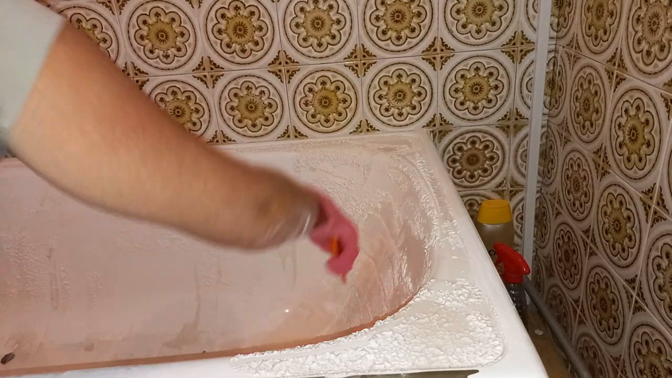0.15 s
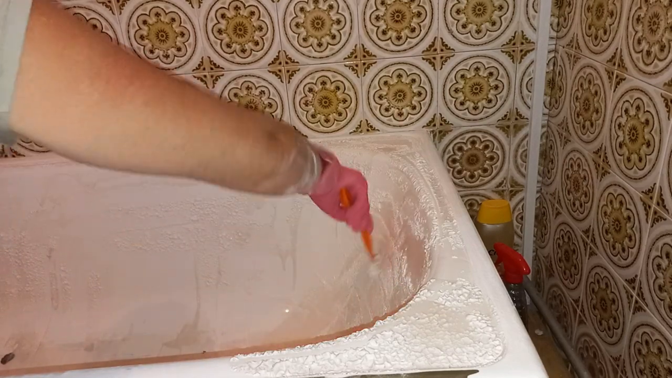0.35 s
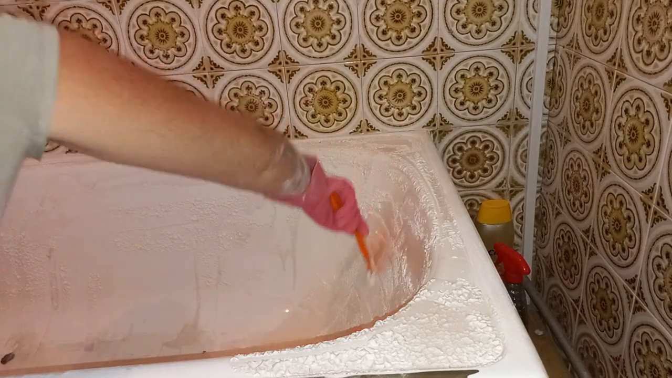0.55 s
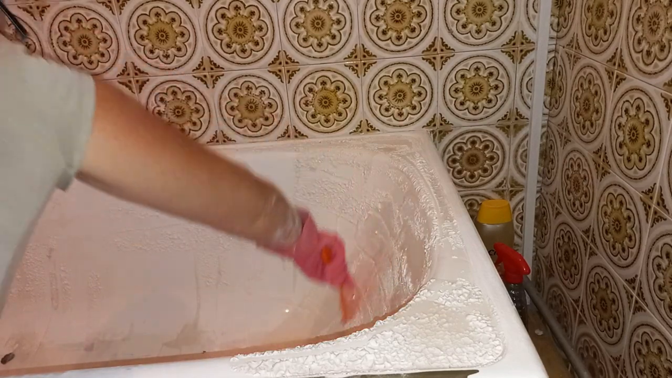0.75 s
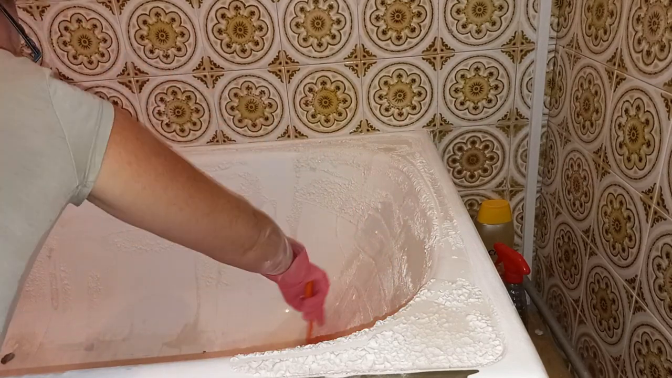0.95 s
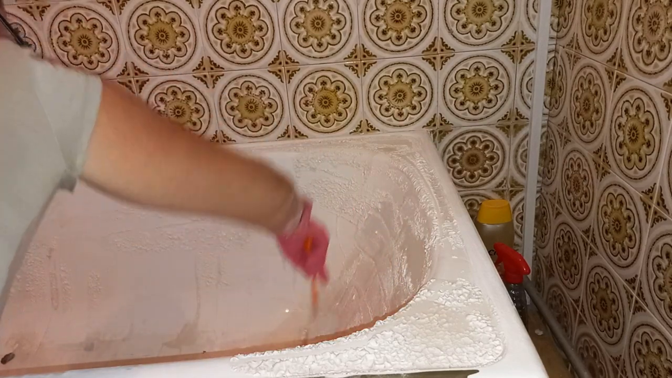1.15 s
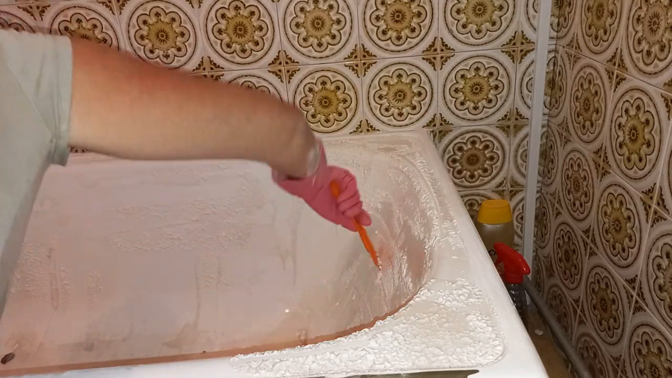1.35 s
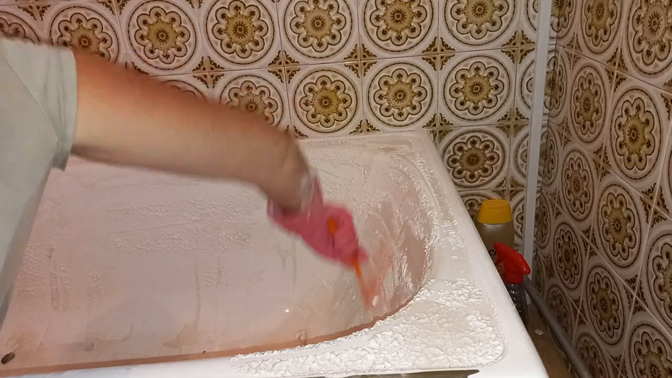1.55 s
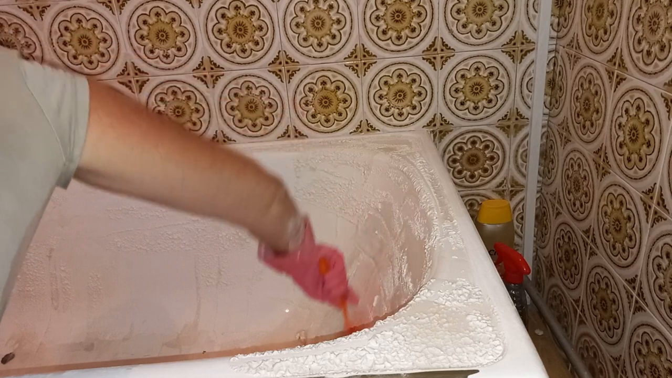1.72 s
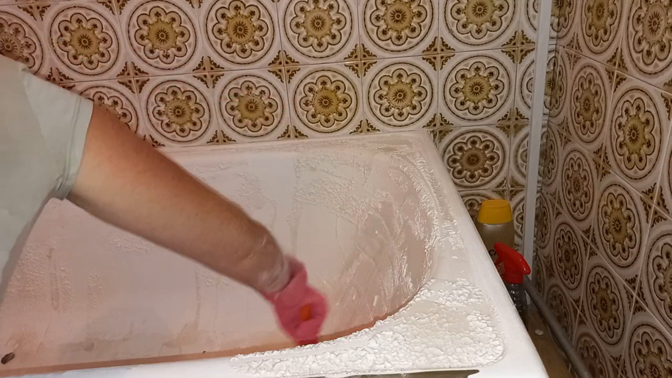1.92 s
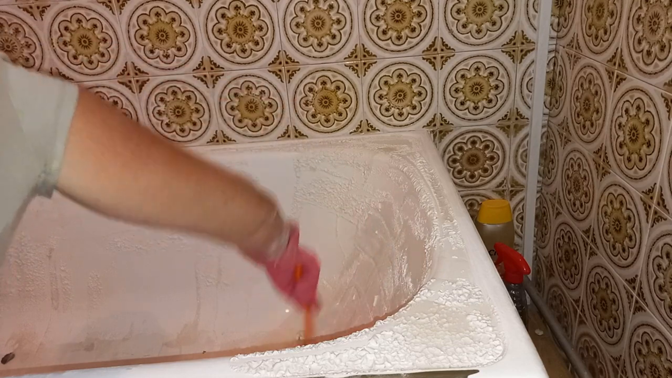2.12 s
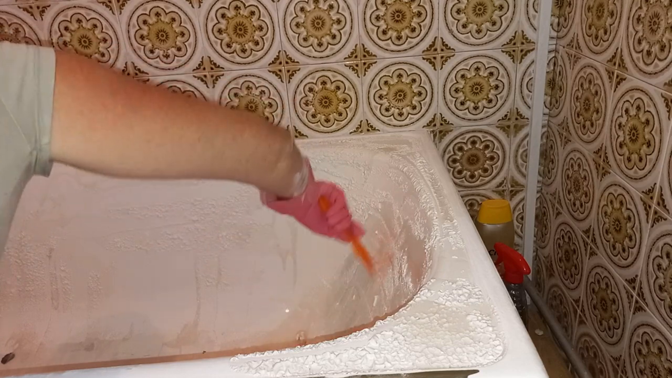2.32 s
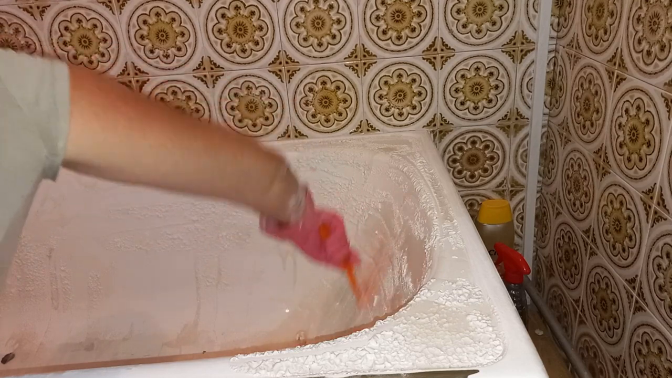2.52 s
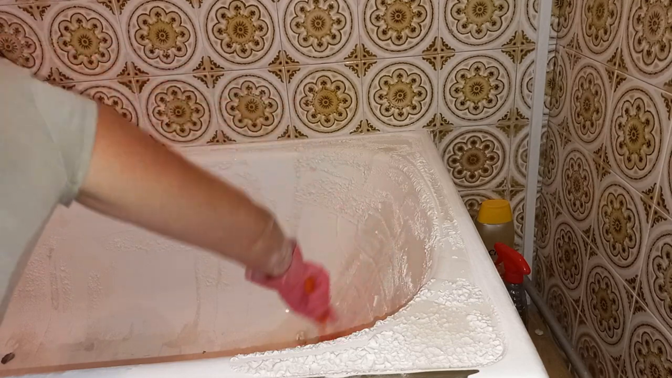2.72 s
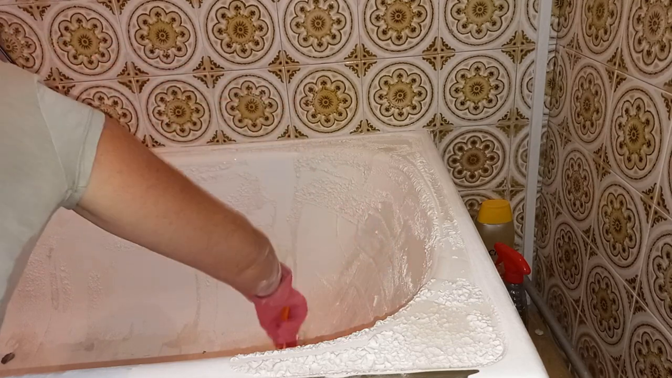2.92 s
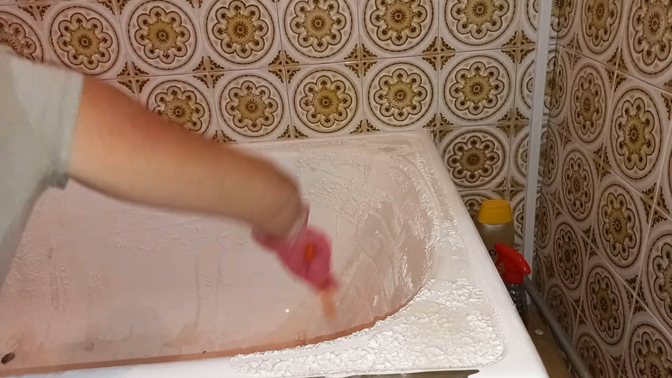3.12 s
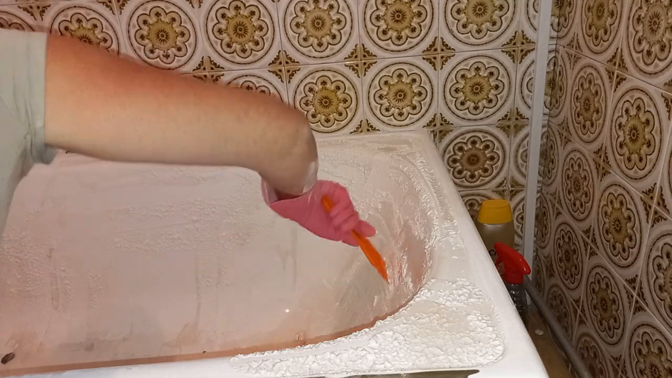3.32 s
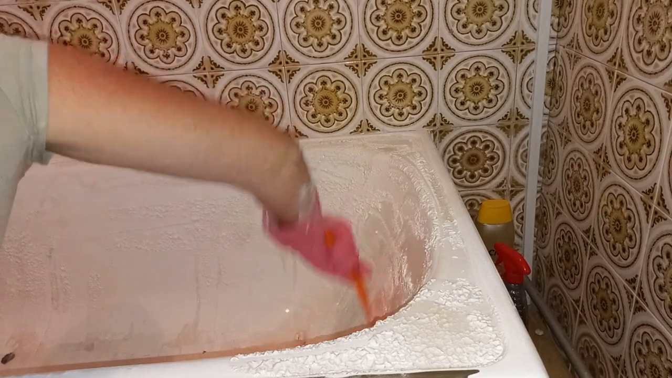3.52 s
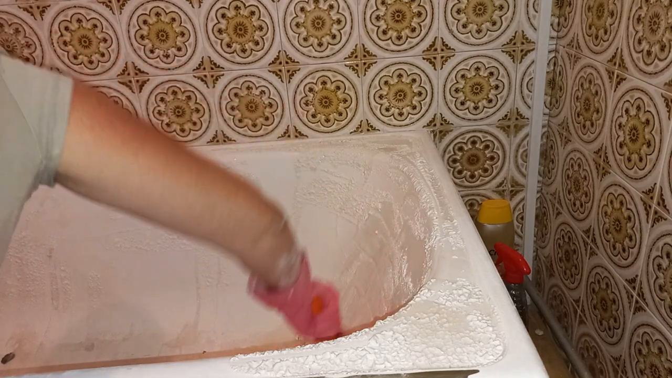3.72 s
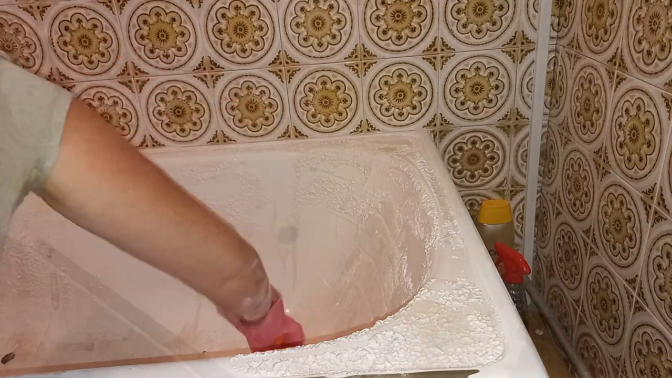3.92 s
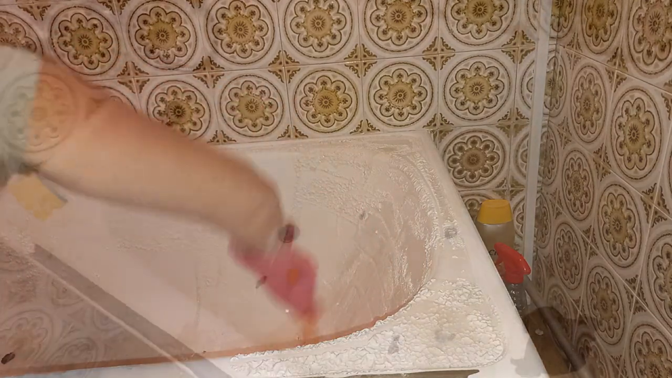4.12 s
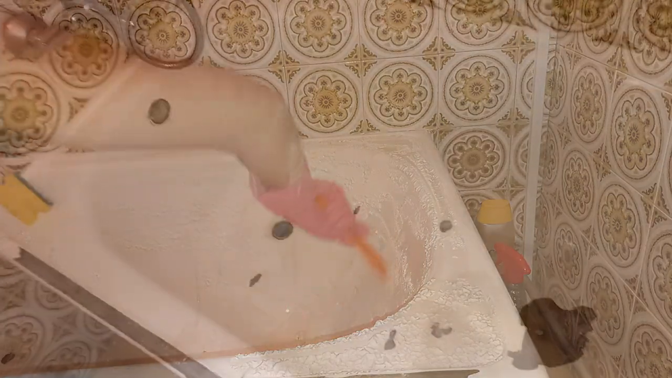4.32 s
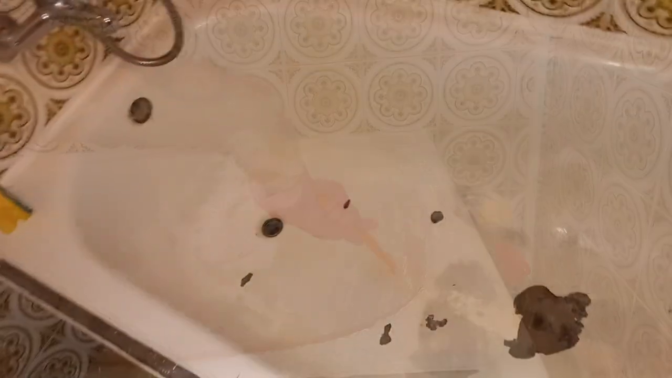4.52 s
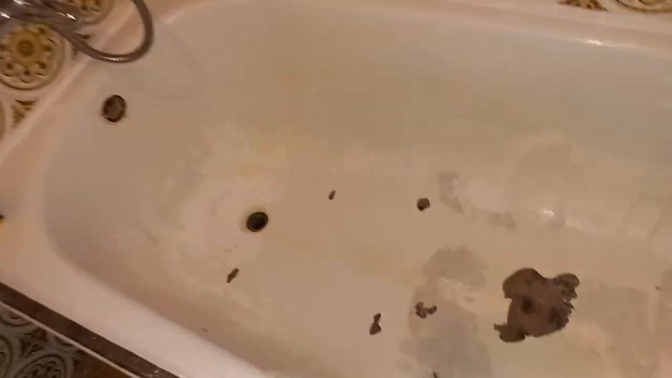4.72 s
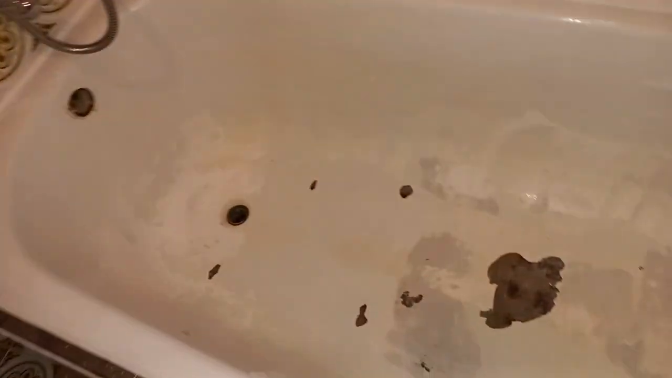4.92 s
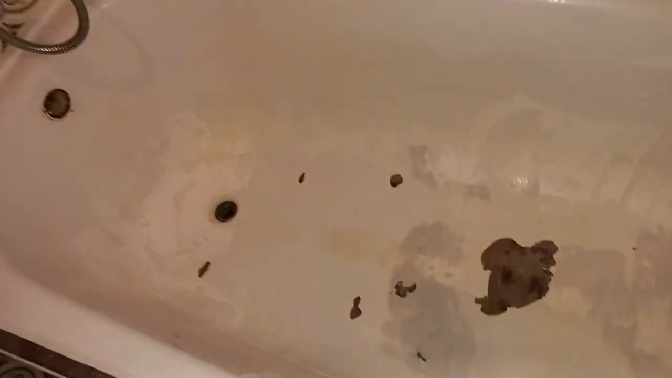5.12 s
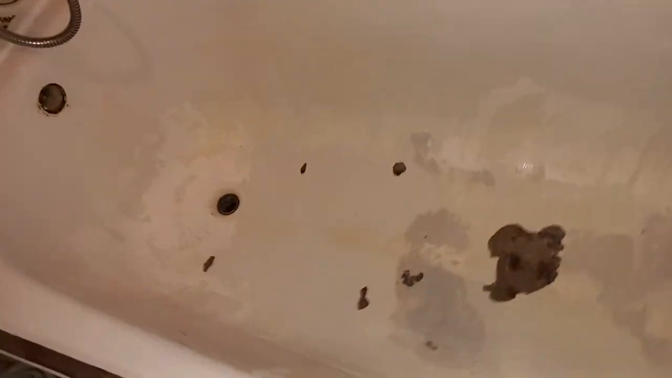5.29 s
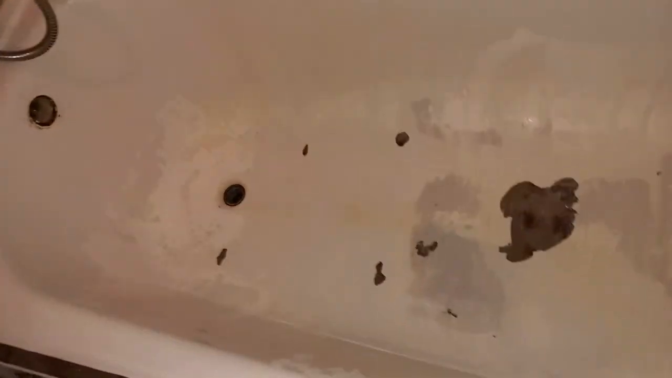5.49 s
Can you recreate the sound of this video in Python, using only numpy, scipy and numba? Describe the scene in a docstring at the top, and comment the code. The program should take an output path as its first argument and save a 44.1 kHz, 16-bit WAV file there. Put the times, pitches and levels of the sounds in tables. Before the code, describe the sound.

Close up and indoors, a blade drags along the wall of an enamel bathtub five times, with short pauses between strokes. Each scrape chatters, resonates in the hollow tub and fades as the hand lets go. The first two are softer, the next three bite with a sharp knock. A sleeve rustles very faintly between them. The scraper then knocks on the tub's bottom and pushes into a longer, grittier scrape over slight microphone hiss.

```python
"""A hand scraper strips softened coating from an enamel bathtub: five strokes on the side wall, then
knocks and a longer push on the bottom. The blade moves by stick-slip friction, a dense train of tiny
impulses that, like the blows of its landing and catching, excite the modes of the tub's shell and the
reflections in its hollow. Behind it are two wet ticks of loosened coating, a faint swish as the hand
swings back, and the hiss of one close microphone."""
import sys
import numpy as np
from scipy import signal
from scipy.fft import rfft, irfft
from scipy.io import wavfile
from scipy.ndimage import uniform_filter1d
from numba import njit

SR = 44100
rng = np.random.default_rng(int(sys.argv[2]) if len(sys.argv) > 2 else 0)


def transcribe(signal):
    """Save signal, clipped to [-1, 1], as a 16-bit WAV file at the path in sys.argv[1]."""
    frames = np.atleast_2d(signal).T
    limited = np.clip(frames, -1, 1)
    pcm = np.round(limited * 32767).astype(np.int16)
    wavfile.write(sys.argv[1], SR, pcm)


N = 244755
TIME = np.arange(N) / SR


def undb(db):
    """Decibels to amplitude ratio."""
    return np.exp(np.asarray(db) * np.log(10) / 20)


def unit(x):
    """Normalisation to an rms of one."""
    return x / np.sqrt(np.mean(x ** 2))


def band(x, lo_hz, hi_hz, order=4):
    """Causal Butterworth band-pass."""
    sos = signal.butter(order, [lo_hz, min(hi_hz, .45 * SR)], "band", fs=SR, output="sos")
    return signal.sosfilt(sos, x)


def colour(x, points, size=2048):
    """Minimum-phase filter through (Hz, dB) points, made by folding the cepstrum."""
    hz, db = np.transpose(points)
    bin_hz = np.arange(size // 2 + 1) * SR / size
    log_gain = np.log(undb(np.interp(np.log(bin_hz + 1), np.log(hz), db)))
    cepstrum = irfft(log_gain)
    cepstrum[1:size // 2] *= 2
    cepstrum[size // 2 + 1:] = 0
    return signal.fftconvolve(x, irfft(np.exp(rfft(cepstrum))))[:len(x)]


def fade(t, t60):
    """Exponential decay that loses 60 dB in t60 seconds."""
    return np.exp(-np.log(1000) * t / t60)


def walk(rate_hz):
    """Linear interpolation between random levels, with an rms of one."""
    step = int(SR / rate_hz)
    held = np.repeat(rng.standard_normal(N // step + 1), step)
    return unit(uniform_filter1d(held, step)[:N])


def placed(x, start):
    """A sound delayed to its start in seconds on the time line."""
    return np.concatenate([np.zeros(int(max(start, 0) * SR)), x, np.zeros(N)])[:N]


@njit
def resonate(x, hz, width_hz):
    """Second-order resonance of fixed bandwidth and moving centre (state-variable filter)."""
    y, band_state, low_state = np.empty(len(x)), 0., 0.
    for i in range(len(x)):
        g, damping = np.tan(np.pi * hz[i] / SR), width_hz / hz[i]
        v = (band_state + g * (x[i] - low_state)) / (1 + g * (g + damping))
        band_state, low_state = 2 * v - band_state, low_state + 2 * g * v
        y[i] = damping * v
    return y


# Spectrum of the microphone's hiss. Each row: frequency in Hz, relative level in dB.
HISS_SPECTRUM = [(18, -44), (30, -5.5), (907, -7), (1890, -10.5), (2210, -11), (4370, -10), (6310, -9.5),
                 (14200, -12), (15800, -14)]


def hiss(level_db=-74):
    """Microphone self-noise: stationary, coloured Gaussian noise."""
    return undb(level_db) * unit(colour(rng.standard_normal(N), HISS_SPECTRUM))


# Return swings of the hand. Each row: centre time in seconds, width in seconds, peak rms level in dB.
HAND_SWINGS = [(1.347, 0.07, -55), (1.668, 0.038, -78), (2.35, 0.13, -72), (2.583, 0.035, -70),
               (3.298, 0.11, -57), (3.564, 0.082, -73), (4.273, 0.1, -56)]


def swishes(length=0.32):
    """Friction noise of glove and sleeve: a thin rustle under a Gaussian envelope."""
    t = TIME[:int(length * SR)] - length / 2
    noise = rng.standard_normal((len(HAND_SWINGS), len(t)))
    rustles = unit(band(noise, 5700, 6350, order=2) + .5 * band(noise, 5000, 9000, order=2)
                   + .22 * band(noise, 9500, 14500, order=2))
    return sum(placed(rustle * undb(db) * np.exp(-(2 * t / width) ** 2), centre + t[0])
               for rustle, (centre, width, db) in zip(rustles, HAND_SWINGS))


# Wet ticks of loosened coating. Each row: start in seconds, nominal peak level in dB.
COATING_TICKS = [(0.7, -50.5), (.823, -58)]


def ticks(t60=0.028, crest_db=9):
    """Damped transients: the sticky coating snaps in short bursts of high noise."""
    t = TIME[:SR // 20]
    snap = unit(band(rng.standard_normal(len(t)), 3500, 4900, order=2)) * fade(t, t60)
    return sum(placed(undb(db - crest_db) * snap, start) for start, db in COATING_TICKS)


# Shell modes, the short ones damped by the coating. Each row: frequency in Hz, t60 in seconds,
# gain in dB when driven on the side wall, gain in dB when driven on the bottom.
SHELL_MODES = [(77.5, 0.067, -6.5, -3.5), (92, .17, -2, -3.5), (116, 0.19, -13, -6),
               (171.6, 0.092, -10, -7.5), (200, 0.081, -24.5, -25.5), (284.6, 0.16, 0.5, 2.5),
               (326, 0.057, -8.5, -3.5), (376.9, 0.24, -2.5, 5.5), (412.5, 0.041, -5, -6.5),
               (495.5, 0.19, -3.5, 1.5), (534.4, 0.28, -7, -1.5), (703.6, 0.16, -2.5, -0.5),
               (823.2, 0.073, -1, -19.5), (909, 0.38, 2, 3), (964, 0.13, 4, 2), (1051.7, 0.28, 2.5, -16),
               (1181, .14, -7, -6), (1250, .19, -8, -2), (1322, .19, 2, -5), (1391, .19, -5, -20),
               (1470, .17, -4, -19), (1569, 0.11, -2, -35), (1795, 0.12, -0.5, 5)]
WALL, BOTTOM = 0, 1
# Colour of the tub's hollow, driven on the side wall. Each row: frequency in Hz, relative gain in dB.
WALL_SPECTRUM = [(500, -35.5), (850, -2), (882, -0.5), (948, 0), (1180, -6), (1500, -4), (2300, -9.5),
                 (4070, -9), (5520, -18), (7300, -16), (8760, -20.5), (9890, -31.5), (11300, -51),
                 (14400, -26), (15500, -32.5)]
# The same, driven on the bottom. Each row: frequency in Hz, relative gain in dB.
BOTTOM_SPECTRUM = [(440, -23.5), (750, -4.5), (873, -6.5), (919, 1.5), (1260, -5), (1780, 0), (2290, -7.5),
                   (2530, -0.5), (3940, -2), (5410, -8.5), (7250, -9), (8760, -15), (10100, -31),
                   (14400, -27), (15500, -17)]


def tub_response(place, hollow_db, hollow_t60, direct=0.54):
    """Impulse responses: a click plus superposed damped modes, and diffuse tails from three spots."""
    t = TIME[:SR // 4]
    spectrum = WALL_SPECTRUM if place == WALL else BOTTOM_SPECTRUM

    def tint(x):
        """Filtering by the hollow, with a gentle bass roll-off."""
        return undb(hollow_db) * band(colour(x, spectrum), 300, SR / 2, order=1)

    shell = tint(direct * (t == 0))
    for hz, t60, *gains_db in SHELL_MODES:
        amplitude = undb(gains_db[place]) * 2 * np.log(1000) / (t60 * SR)
        shell += amplitude * fade(t, t60) * np.cos(2 * np.pi * hz * t)
    tails = [unit(rng.standard_normal(len(t)) * fade(t, hollow_t60)) for _ in range(3)]
    return shell, [tint(tail / np.sqrt(len(t))) for tail in tails]


def slips(per_second, scatter_db, chatter_hz, chatter_db, uneven_db):
    """Stick-slip friction: random impulses of unequal size, bunched by the blade's irregular chatter."""
    clicks = (rng.random(N) < per_second / SR) * rng.choice([-1, 1], N)
    sizes = undb(scatter_db * rng.standard_normal(N))
    cycles = np.cumsum(chatter_hz * np.exp(.4 * walk(90))) / SR
    # each cycle starts with a release and dies down while the edge sticks again
    return unit(clicks * sizes * undb(-chatter_db * (cycles % 1) + uneven_db * walk(55)))


# Bands of the drag under firm pressure: shudder, dull push, hollow honk, blade rasp, edge, grit.
# Each row: lower and upper limit in Hz, level in the coating and on the enamel in dB relative to
# FIRM_DB, exponent of growth with pressure.
DRAG_BANDS = [(68, 220, -19, -10, 0.49), (230, 540, -2.5, -10.5, 0.68), (573, 860, -1.5, -18.5, 0.82),
              (944, 2215, 1, 0, 1.03), (2155, 4600, -12, -3, 1.185), (5080, 14700, -16.5, -3.5, 1.166)]
FIRM_DB, LOOSE_BLADE_HZ = -28, 980
CUSHION_DB, CUSHION_S = 14, 0.015  # the soft coating briefly holds back the treble on landing
LANDING_DB, LANDING_S = 26.5, 0.02  # contact builds up this much, this fast


def drag(t, pressure_db, bite, tone_db, blade_hz, response, force):
    """Sliding friction, a power law of pressure: dull in the coating (bite 0), bright on enamel (1)."""
    effort_db = pressure_db - FIRM_DB
    # the blade rings higher as it bites, and lower as the hand lets go
    bend = undb(np.minimum(effort_db, 0)) ** .1
    ring_hz = (LOOSE_BLADE_HZ + bite * (blade_hz - LOOSE_BLADE_HZ)) * bend
    blade = resonate(force, np.clip(ring_hz, 800, 3000), width_hz=470.) + 0.24 * force
    blade *= np.std(band(force, 800, 2000)) / np.std(band(blade, 800, 2000))
    shudder_db, push_db, honk_db, edge_db, grit_db = tone_db
    cushion_db = CUSHION_DB * np.exp(-t / CUSHION_S)
    parts = [(force, shudder_db), (force, push_db), (force, honk_db), (blade, 0),
             (force, edge_db - cushion_db), (force, grit_db - cushion_db)]
    out = np.zeros(len(t))
    for (source, trim_db), (lo_hz, hi_hz, coating_db, enamel_db, growth) in zip(parts, DRAG_BANDS):
        surface_db = coating_db + bite * (enamel_db - coating_db)
        db = FIRM_DB + growth * effort_db + surface_db + trim_db
        tub_gain = np.sqrt(np.sum(band(response, lo_hz, hi_hz) ** 2))
        lead_s = .006 + 1 / lo_hz  # the force precedes the ring it builds up, most of all in the bass
        out += band(source, lo_hz, hi_hz) * undb(np.interp(t + lead_s, t, db)) / tub_gain
    return out * undb(-LANDING_DB * np.clip(1 - t / LANDING_S, 0, 1))


# Skids on the coating. Each row: start in seconds, length in seconds, initial pressure in dB, its fall
# in dB (negative for a rise), trims of shudder, push and edge in dB.
SKIDS = [(0.703, 0.17, -89.5, 1, -7.5, -3, -2), (0.793, 0.096, -67.5, -19, -0.5, -11, 19),
         (1.605, .15, -75.5, 3, -6, -7, -5), (1.75, 0.094, -41.5, -10.5, 0.5, -5, 9.5),
         (2.61, 0.11, -63.5, -2, -10, -4, -10), (2.685, .1, -45.5, -5, 15, 1, -2.5),
         (3.59, 0.26, -82, 5.5, -2.5, 12, -2.5), (4.636, 0.13, -64, 12.5, -6.5, 4, -8),
         (4.778, 0.23, -18, 53, 12.5, 10.5, -4.5)]


def skids(begin, end, response, force, release_s=.014):
    """Friction without cutting: the blade slides on the coating as pressure changes linearly in dB."""
    out = np.zeros(N)
    for start, length, db, fall_db, shudder_db, push_db, edge_db in SKIDS:
        if begin <= start < end:
            inside = (TIME >= start) & (TIME <= start + length)
            t = TIME[inside] - start
            contact = np.clip((length - t) / release_s, 0, 1)
            tone_db = (shudder_db, push_db, 0, edge_db, edge_db - 6)
            skid = drag(t, db - fall_db * t / length, 0, tone_db, LOOSE_BLADE_HZ, response, force[inside])
            out += placed(contact * skid, start)
    return out


# The blade lands or catches. Each row: start in seconds, nominal peak level in dB, dull share and
# bright share in dB relative to the middle band.
BLOWS = [(0.795, -51.5, 1, -10), (0.855, -34, -2, -2.5), (1.693, -43.5, 31, -33), (1.759, -33, 2, -18),
         (1.835, -11, -21, -12.5), (2.617, -50, -4, -28), (2.698, -31, 8, -32), (2.779, -17, -10.5, -13),
         (3.589, -64, 23, -18), (3.689, -29.5, 23, -20), (3.704, -15, 18, -30), (3.745, -8.5, -2, -9),
         (3.859, -10, -13, -4), (4.65, -43.5, 23, -15.5), (4.758, -18.5, 23.5, -27),
         (4.793, -10.5, 14, -30), (4.801, -5, 16.5, -14), (4.837, -15.5, 18.5, -0.5),
         (5.008, -14.5, 34, -10), (5.143, -10.5, 5, -16)]


def knocks(begin, end, response, crunch=0.066, crunch_t60=0.049, crest_db=11):
    """Impact excitation: an impulse as the blade strikes, then a brief crunch through the coating."""
    rows = [row for row in BLOWS if begin <= row[0] < end]
    starts, db, dull_db, bright_db = np.transpose(rows)[:, :, None]
    t = TIME[:SR // 20]
    blows = (t == 0) + crunch * rng.standard_normal((len(rows), len(t))) * fade(t, crunch_t60)

    def ring_rms(x):
        """Rms of the tub's response over the first 20 ms of each blow."""
        ring = signal.fftconvolve(x, response[None, :len(t)], axes=1)
        return np.std(ring[:, :SR // 50], axis=1, keepdims=True)

    force = 0
    for lo_hz, hi_hz, share_db in [(315, 620, dull_db), (750, 1900, 0), (2200, 5000, bright_db)]:
        part = band(blows, lo_hz, hi_hz, order=3)
        force = force + undb(share_db) * part / ring_rms(part)
    force = force * undb(db - crest_db) / ring_rms(force)
    return sum(placed(blow, start) for blow, start in zip(force, starts[:, 0]))


def sticking(hold_s=.018, dip_db=-4):
    """Static friction: the gain of the drag dips as the edge holds just before each blow."""
    held = np.any([(TIME > start - hold_s) & (TIME < start) for start, *_ in BLOWS], axis=0)
    return undb(dip_db * uniform_filter1d(1. * held, SR // 400))


# Hand pressure, one curve per stroke, the first already under way. Each point: time in seconds,
# pressure in dB on the scale of FIRM_DB.
HAND_PRESSURE = [
    [(-.1, -31.5), (.1, -29.5), (.16, -36), (.195, -44.5), (.245, -52), (.37, -84)],
    [(.845, -43.5), (.872, -42), (.905, -37.5), (.945, -32), (1.02, -34.5), (1.08, -29), (1.125, -37),
     (1.205, -31), (1.31, -57), (1.41, -90.5)],
    [(1.822, -27.5), (1.85, -17.5), (1.91, -23.5), (1.965, -27.5), (2.06, -25.5), (2.145, -37), (2.22, -35),
     (2.385, -79)],
    [(2.768, -35.5), (2.79, -23.5), (2.845, -23.5), (2.878, -20), (2.945, -25), (2.995, -21), (3.07, -30.5),
     (3.135, -34), (3.29, -75)],
    [(3.695, -49.5), (3.75, -21), (3.8, -27.5), (3.87, -22.5), (3.935, -22.5), (4.01, -26), (4.075, -23),
     (4.17, -31.5), (4.34, -82.5)],
    [(5.0, -58), (5.034, -32), (5.11, -32), (5.16, -26), (5.225, -30), (5.26, -25), (5.39, -31),
     (5.5, -26.5), (5.55, -29)],
]
# Timbre of the strokes. Each row: time to cut through the coating in seconds, trims of shudder, push,
# honk, edge and grit in dB, blade resonance at full bite in Hz, low swell of the dig in dB.
STROKE_TIMBRES = [(.05, -19.5, -3, 7.5, 0.5, -3, 990, 0.5), (.17, 2, 0.5, 1.5, 1.5, -1, 1390, 6.5),
                  (.12, -2, -1, 2.5, 0, -0.5, 1300, 3), (.15, -1.5, -6, 0.5, -2, -6.5, 1342, 3.5),
                  (.24, -3.5, -2, 0.5, -0.5, -3, 1430, 1.5), (.5, 2.5, 2.5, 1.5, 4.5, 4, 1310, -3.5)]
DIG_AT, DIG_WIDTH = 0.35, 0.12  # where the blade digs deepest and for how long, as shares of a stroke


def strokes(begin, end, response, force):
    """Friction under a varying load: the edge sinks through the coating as the hand bears down."""
    out = np.zeros(N)
    for curve, timbre in zip(HAND_PRESSURE, STROKE_TIMBRES):
        times, pressure_db = np.transpose(curve)
        cut_s, shudder_db, push_db, honk_db, edge_db, grit_db, blade_hz, dig_db = timbre
        if begin <= times[-1] < end:
            inside = (TIME >= times[0]) & (TIME <= times[-1])
            t = TIME[inside] - times[0]
            load_db = np.interp(TIME[inside], times, pressure_db)
            bite = np.sin(np.pi / 2 * np.clip(t / cut_s, 0, 1)) ** 2
            swell_db = dig_db * np.exp(-((np.linspace(0, 1, len(t)) - DIG_AT) / DIG_WIDTH) ** 2)
            tone_db = (shudder_db + swell_db, push_db + swell_db, honk_db + .7 * swell_db,
                       edge_db, grit_db)
            out += placed(drag(t, load_db, bite, tone_db, blade_hz, response, force[inside]), times[0])
    return out


def scraping(tub, force, begin, end):
    """Forced vibration: the blade's force from begin to end seconds, convolved with the tub's response."""
    shell, hollows = tub
    response = (shell + hollows[0])[:SR // 10]
    friction = strokes(begin, end, response, force) + skids(begin, end, response, force)
    drive = sticking() * friction + knocks(begin, end, response)
    drive = drive[(TIME >= begin) & (TIME < end)]
    # the reflections shift at constant power as the contact wanders along the edge
    shares = np.array([walk(70)[:len(drive)] for _ in hollows])
    shares /= np.sqrt(np.sum(shares ** 2, axis=0))
    reflected = sum(signal.fftconvolve(drive * share, hollow) for share, hollow in zip(shares, hollows))
    return placed(signal.fftconvolve(drive, shell) + reflected, begin)


def scene(bottom_from_s=4.5):
    """Superposition of the sources: side wall first, then the bottom; both channels alike."""
    wall = tub_response(WALL, hollow_db=0.5, hollow_t60=0.12)
    bottom = tub_response(BOTTOM, hollow_db=1.0, hollow_t60=0.17)
    wall_force = slips(per_second=5000, scatter_db=3.0, chatter_hz=130.3, chatter_db=9.0, uneven_db=1.54)
    bottom_force = slips(per_second=6000, scatter_db=4.0, chatter_hz=114.7, chatter_db=6.5, uneven_db=1.0)
    out = scraping(wall, wall_force, 0, bottom_from_s)
    out += scraping(bottom, bottom_force, bottom_from_s, np.inf)
    out += swishes() + ticks() + hiss()
    return np.array([out, out])


def record(dry, top_hz=15750):
    """Band limiting: a steep elliptic low-pass cuts the highest treble."""
    return signal.sosfilt(signal.ellip(10, .2, 80, top_hz, fs=SR, output="sos"), dry)


dry = scene()
out = record(dry)
transcribe(out)
```